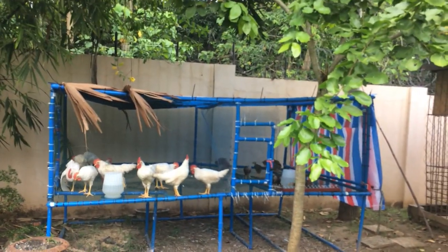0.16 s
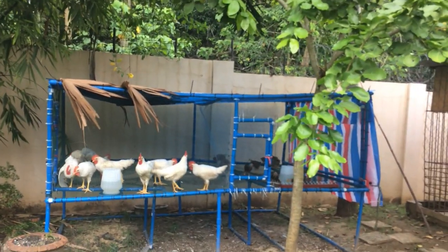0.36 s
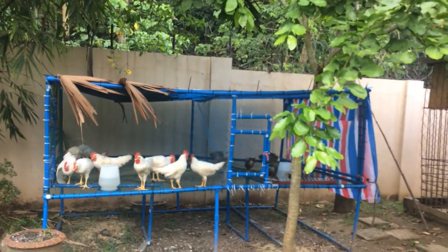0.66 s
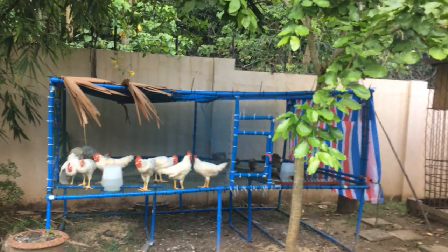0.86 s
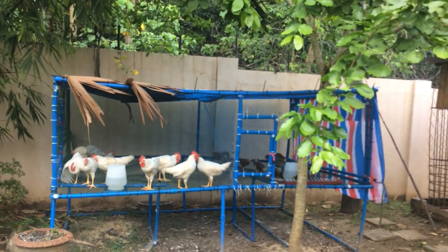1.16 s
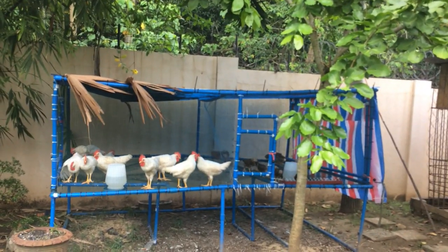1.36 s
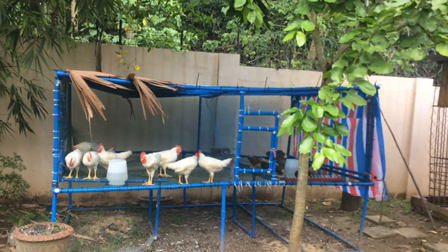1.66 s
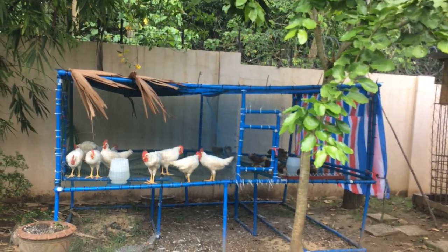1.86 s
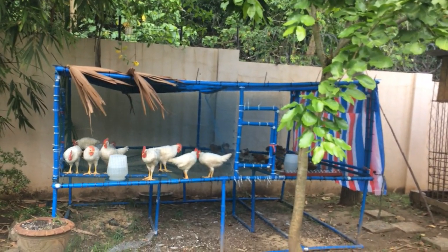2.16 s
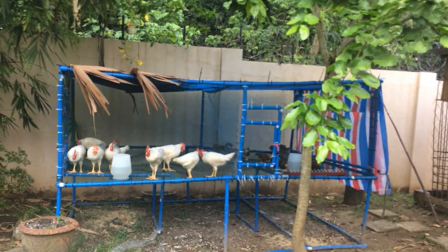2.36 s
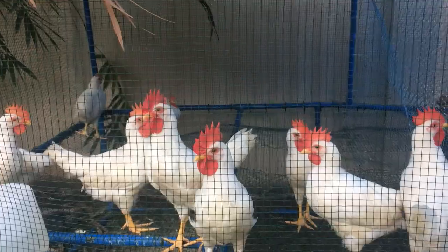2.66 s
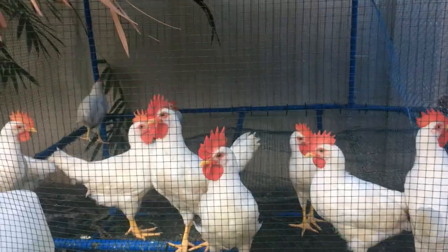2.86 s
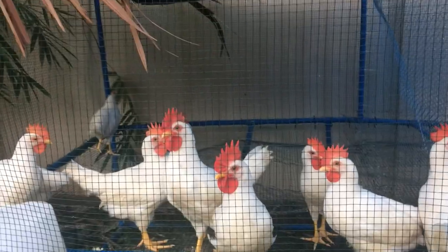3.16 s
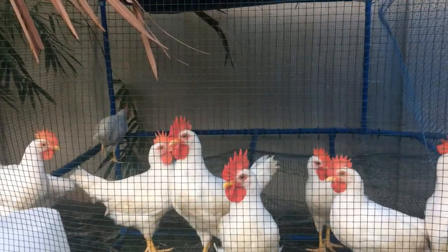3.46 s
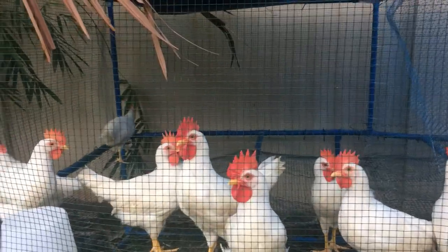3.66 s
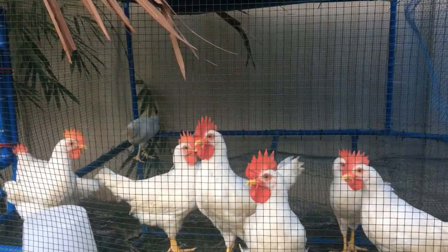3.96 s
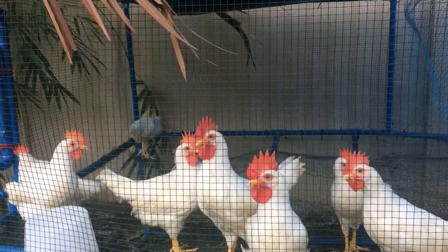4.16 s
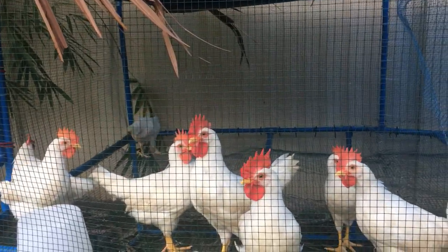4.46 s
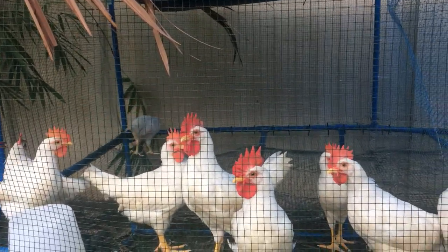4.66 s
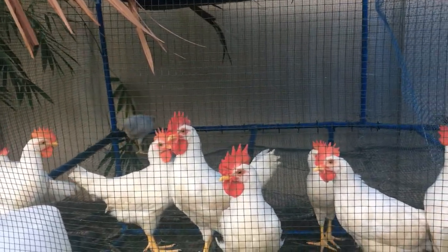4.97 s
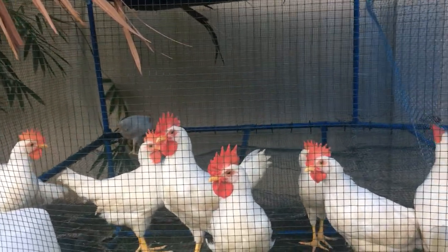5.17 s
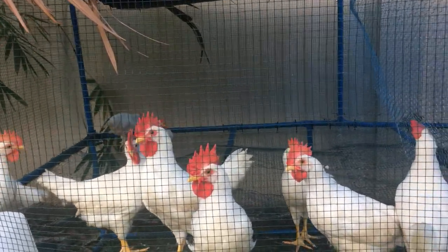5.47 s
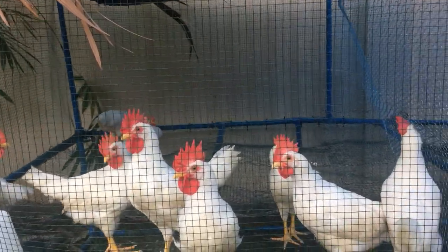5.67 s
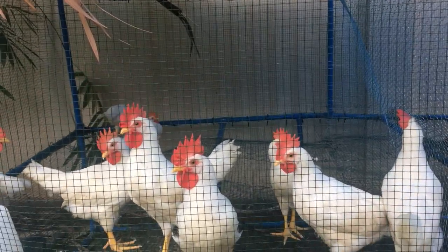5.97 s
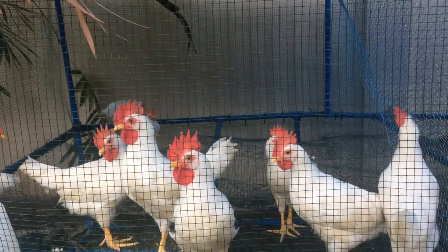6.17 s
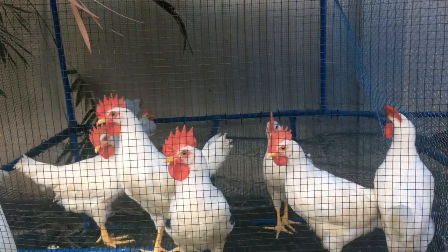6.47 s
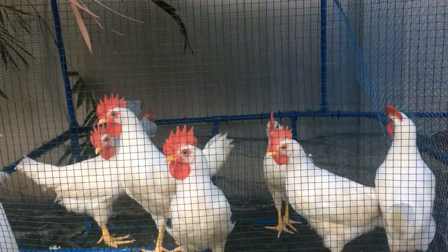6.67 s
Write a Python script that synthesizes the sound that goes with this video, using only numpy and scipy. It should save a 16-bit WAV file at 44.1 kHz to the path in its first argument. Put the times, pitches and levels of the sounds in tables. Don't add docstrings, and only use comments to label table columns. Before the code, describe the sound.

A hen clucks seven quick throaty puffs among wild bird whistles, then after a tiny dropout, thin peeps, mesh ticks, trills and low engine rumble.

```python
import sys
import numpy as np
from scipy import signal
from scipy.io import wavfile
from scipy.ndimage import uniform_filter1d

SR = 44100
rng = np.random.default_rng(int(sys.argv[2]) if len(sys.argv) > 2 else 0)


def ratio(d):
    e = np.asarray(d, float) / 20
    return 10 ** e


def file_out(sig):
    cols = np.atleast_2d(sig).T
    lim = np.clip(cols, -1, 1)
    pcm = np.round(lim * 32767).astype(np.int16)
    wavfile.write(sys.argv[1], SR, pcm)


N = 301203


def evened(x):
    return x / np.sqrt(np.mean(x ** 2) + 1e-20)


def add(mix, start_s, sound):
    part = mix[round(start_s * SR):][:len(sound)]
    part += sound[:len(part)]


def wander(count, smooth):
    size = max(int(smooth), 1)
    drift = uniform_filter1d(rng.standard_normal(count), size)
    return evened(uniform_filter1d(drift, size))


def whistle(hz, db, partials, flutter_db, hoarse):
    turns = np.cumsum(hz * (1 + hoarse * wander(len(hz), 60))) / SR
    tone = sum(ratio(d) * np.sin(2 * np.pi * k * turns) for k, d in partials)
    return np.sqrt(2) * ratio(db + flutter_db * wander(len(hz), 66)) * tone


def sagging(table, loss_per_s):
    return [(s, length, hz, hz * np.exp(-loss_per_s * length), db) for s, length, hz, db in table]


def calls(table, partials, flutter_db, hoarse, edge):
    out = np.zeros(N)
    for start_s, length_s, start_hz, end_hz, db in table:
        hz = np.linspace(start_hz, end_hz, round(length_s * SR))
        fade = signal.windows.tukey(len(hz), edge)
        add(out, start_s, fade * whistle(hz, db, partials, flutter_db, hoarse))
    return out


def hen():
    # start_s, peak_db, second_partial_hz
    clucks = [
        (0.0682, -45, 1244),
        (0.2353, -41.5, 1246),
        (0.4142, -44.5, 1210),
        (0.5952, -45, 1240),
        (0.7672, -45.5, 1233),
        (0.953, -43.5, 1282),
        (1.178, -45.5, 1224),
    ]
    partials = [(1, 0), (3 / 2, -12), (2, -10)]
    out, t = np.zeros(N), np.arange(1500) / SR
    puff = np.minimum(t / 0.0032, 1) * np.exp(-np.maximum(t - .012, 0) / 0.0052)
    for start_s, db, hz in clucks:
        pitch_hz = hz * (1.05 - 3.5 * t)
        add(out, start_s - .003, puff * whistle(pitch_hz, db - 4.5, partials, 0.9, 0.015))
    return out


def young_birds():
    # start_s, length_s, second_partial_hz, level_db
    peep_rows = [(2.645, 0.051, 6446, -72), (2.735, 0.029, 6520, -61), (2.83, 0.031, 6650, -66.5),
                 (3.145, 0.033, 6290, -63.5), (3.23, .03, 6180, -67), (3.345, 0.036, 6020, -58.5),
                 (3.475, 0.0236, 6470, -64.5), (4.12, .055, 6040, -70), (4.23, .041, 5914, -70),
                 (4.38, .11, 5850, -72), (4.715, .05, 6070, -69), (4.9, .041, 6140, -64),
                 (5.615, 0.059, 6300, -60), (5.72, 0.095, 6120, -61), (6.19, .055, 5900, -69)]
    return calls(sagging(peep_rows, 0), [(1, 0), (1 / 2, -5)], 5.2, 0.012, 0.49)


def wild_birds():
    # start_s, length_s, start_hz, level_db
    dives = [(.335, .055, 4670, -63), (.975, .04, 5000, -65), (1.4, 0.075, 4350, -62),
             (1.825, 0.063, 4622, -62), (2.4, 0.045, 2644, -58), (2.92, 0.0307, 2521, -58),
             (3.655, 0.056, 4270, -62), (4.195, .015, 2190, -55), (4.222, .05, 2975, -52),
             (4.35, .021, 2090, -60), (4.41, .03, 3704, -64), (4.44, 0.022, 2410, -56.5),
             (5.02, 0.034, 3900, -57), (5.44, .042, 2810, -64), (5.768, .04, 5750, -60),
             (6.2, 0.028, 3880, -63)]
    # start_s, length_s, start_hz, level_db
    droops = [(.005, 0.083, 2670, -58), (.17, 0.035, 3710, -61.5), (.195, 0.076, 2730, -60),
              (.35, 0.075, 2812, -59.5), (.74, 0.04, 1935, -54.5), (1.145, .03, 2610, -60),
              (1.185, 0.13, 3840, -63.5), (1.88, 0.093, 3450, -63), (1.975, 0.043, 4350, -63),
              (2.065, 0.04, 2870, -56), (2.18, 0.0375, 4300, -59), (2.29, 0.041, 3600, -61),
              (3.025, .04, 2865, -54.5), (4.525, 0.096, 3080, -59.5), (4.685, 0.044, 2550, -57.5),
              (4.73, .031, 3130, -61), (6.43, .045, 3830, -58)]
    # start_s, length_s, pitch_hz, level_db
    pips = [(.59, 0.058, 438, -59), (.645, 0.054, 3810, -64), (1.14, .021, 2330, -56),
            (1.27, 0.026, 3100, -61), (1.715, 0.038, 3520, -61), (2.14, 0.022, 688, -57),
            (2.21, 0.027, 650, -51), (2.21, 0.07, 2260, -58.5), (2.63, 0.033, 2430, -58),
            (3.415, .032, 2430, -59), (3.49, .015, 3420, -62), (3.7, .015, 4350, -57.5),
            (4.01, 0.044, 3000, -65), (4.055, .046, 2386, -59.2), (4.43, .05, 1120, -60),
            (4.81, 0.026, 3160, -59.5), (4.91, 0.042, 3180, -63), (5.0, .035, 2650, -61),
            (5.39, 0.012, 3870, -60), (5.62, 0.044, 1730, -57.5), (6.3, .02, 2240, -57)]
    rows = sagging(dives, 5.2) + sagging(droops, 1.4) + sagging(pips, 0)
    return calls(rows, [(1, 0)], 3, .017, .45)


def trill_bird():
    # start_s, level_db
    trill_strokes = [
        [(5.397, -56), (5.408, -56), (5.413, -47), (5.422, -54), (5.45, -53), (5.47, -58)],
        [(6.263, -52), (6.274, -48), (6.293, -45), (6.31, -53), (6.347, -52), (6.378, -48), (6.4, -53),
         (6.43, -57)],
    ]
    warble_s, warble_hz, swing_hz = .0272, 2990, 320
    onset_hz, onset_s = 800, .005
    out = np.zeros(N)
    for rows in trill_strokes:
        s, db = np.transpose(rows)
        t = np.arange(0, s[-1] - s[0], 1 / SR)
        phase = 2 * np.pi * t / warble_s
        hz = warble_hz + swing_hz * np.cos(phase) + onset_hz * np.exp(-t / onset_s)
        level_db = np.interp(t + s[0], s, db) + 2.5 * np.sin(phase - .5)
        fade = signal.windows.tukey(len(t), .04)
        add(out, s[0], fade * whistle(hz, level_db, [(1, 0)], 4.5, .035))
    return out


def rises():
    # start_s, length_s, top_hz, level_db, pitch_unsteadiness (0-1)
    rise_rows = [
        (.708, .19, 6700, -59.5, .006),
        (2.195, .15, 6850, -58, .006),
        (4.272, .085, 5800, -61.5, .007),
        (6.365, .165, 6800, -63, .03),
        (6.57, .06, 7900, -71, .04),
    ]
    climb_hz_per_s, widest_hz, fade_db = 17000, 2200, -10
    out = np.zeros(N)
    for start_s, length_s, top_hz, db, hoarse in rise_rows:
        u = np.linspace(0, 1, round(length_s * SR))
        span_hz = min(climb_hz_per_s * length_s, widest_hz)
        hz = top_hz - span_hz * (1 - u) ** (8.5 * length_s)
        fade = signal.windows.tukey(len(u), .2)
        add(out, start_s, fade * whistle(hz, db + fade_db * u, [(1, 0)], 4, hoarse))
    return out


def flock():
    when, length, pitch, glide, size = rng.random((120, 5)).T
    start_hz = 2300 * ratio(5.0 * pitch)
    end_hz = start_hz * (.7 + .25 * glide)
    rows = np.transpose([when * N / SR, .015 + .03 * length, start_hz, end_hz, 5 * size - 71])
    return calls(rows, [(1, 0)], 3, .05, .8)


def ticks():
    # start_s, peak_db, dullness_db (low band minus high band)
    tick_rows = [(0.7158, -49, -5), (1.9119, -52, -12), (2, -39.5, -5), (2.3294, -42.5, -2.5),
                 (2.4094, -48, -1), (3.4381, -46, -2), (3.71, -38.5, -16), (3.9639, -58, -11),
                 (4.3024, -38, -9), (4.345, -43, -4), (5.146, -53, 4.5), (5.449, -46, -5),
                 (5.54, -47, -10.5), (5.676, -48, -1), (5.9873, -42, -4), (6.0131, -52, -5.5)]
    out, t = np.zeros(N), np.arange(600) / SR
    for start_s, db, dull_db in tick_rows:
        crack = rng.standard_normal(600)
        bright = np.diff(crack, prepend=0)
        dull = ratio(dull_db) * uniform_filter1d(crack, size=7) * 3.1
        add(out, start_s, ratio(db + 0.5) * (bright + dull) * np.exp(-t / 0.0023))
    return signal.lfilter(*signal.butter(2, 6500, fs=SR), out)


def bumps():
    # start_s, peak_db
    knocks = [
        (1.2776, -29.5),
        (2.105, -44),
        (2.217, -48),
        (2.4745, -42),
        (2.544, -46),
        (2.923, -34),
    ]
    out, u = np.zeros(N), np.arange(-600, 900) / SR
    push = -.75 * np.exp(-abs(u) / np.where(u < 0, .0003, .001))
    swing = -.3 * np.cos(2 * np.pi * 95 * u) * np.exp(-(u / .007) ** 2)
    for start_s, db in knocks:
        add(out, start_s - 600 / SR, ratio(db) * (push + swing))
    return out


def walls(x, t60):
    taps = np.zeros(SR // 2)
    at = np.arange(300, len(taps) - 22, 22)
    taps[at + rng.integers(0, 22, len(at))] = rng.choice([-1., 1.], len(at))
    taps *= ratio(-60 * np.arange(len(taps)) / SR / t60)
    return signal.fftconvolve(x, taps / np.linalg.norm(taps))[:N]


def drones():
    # start_s, end_s, start_hz, end_hz, level_db
    engines = [(.2, 1.35, 33, 49, -64), (.4, 1.4, 56, 54.5, -58), (1.38, 2.4, 54.6, 55.6, -54),
               (1.5, 2.0, 171, 178, -61), (2.3, 2.57, 171, 172, -64), (2.6, 3.25, 57, 63, -49),
               (3.2, 3.6, 63, 67, -50), (3.6, 4.36, 66, 69.5, -50), (3.2, 3.85, 127, 145, -55),
               (3.9, 4.25, 143, 150, -58), (2.8, 3.25, 81, 81, -49), (2.62, 3.0, 150, 120, -53),
               (2.6, 2.85, 180, 183, -54), (3.0, 4.9, 183, 179.5, -58.5), (4.75, 5.72, 179, 177.5, -56),
               (5.8, 6.4, 176, 172, -58), (6.45, 6.8, 170, 172, -57), (4.5, 5.05, 87.5, 85, -55),
               (5.1, 6.05, 89.5, 88.5, -55), (5.9, 6.83, 89, 88, -50)]
    # start_s, end_s, start_hz, end_hz, level_db
    horn = [
        (1.66, 1.84, 702, 699, -63.5),
        (1.8, 2.64, 697, 687, -66),
        (1.8, 2.48, 612, 603, -63),
        (2.46, 2.62, 607, 609, -65),
    ]
    out = np.zeros(N)
    for start_s, end_s, start_hz, end_hz, db in [*engines, *horn]:
        hz = np.linspace(start_hz, end_hz, round((end_s - start_s) * SR))
        tone = np.sin(2 * np.pi * np.cumsum(hz * (1 + 0.0054 * wander(len(hz), 2960))) / SR)
        level = ratio(db + 2.03 * wander(len(hz), 90000 / hz.mean() + 600))
        add(out, start_s, np.sqrt(2) * level * tone * signal.windows.tukey(len(hz), .45))
    return out


def noise(shape, patchy_db, flicker_db, size, count):
    frames, hz = 4 * count // size + 5, np.fft.rfftfreq(size, 1 / SR)
    a, b, patches = rng.standard_normal((frames, len(hz), 3)).T
    patches = evened(uniform_filter1d(uniform_filter1d(patches, 7, axis=0), 12, axis=1))
    f, db = np.transpose(shape)
    colour_db = np.interp(np.log(hz + 1), np.log(f + 1), db)[:, None]
    z = (a + 1j * b) * ratio(colour_db + patchy_db * patches + flicker_db * wander(frames, 2))
    return evened(signal.istft(z, nperseg=size, noverlap=size * 3 // 4)[1][:count])


def leaves():
    # peak_s, peak_db, rise_s, fall_s
    gusts = [(.67, -66, .01, .007), (.71, -62.5, .01, 0.035), (2.0, -69, 0.06, 0.043),
             (2.57, -65, .05, .02), (2.65, -63, 0.024, .026), (2.92, -68, .026, .085),
             (3.32, -68, .066, .012), (3.45, -67.5, .04, .035), (3.71, -66.5, .014, 0.11),
             (4.2, -67.5, .11, .41), (4.7, -66.5, .008, 0.026), (5.35, -73, .058, .01),
             (5.45, -64.5, .019, 0.033), (5.54, -66, .033, .065), (6.0, -70, .028, 0.036),
             (6.6, -70, .1, 0.098)]
    # pitch_hz, level_db (per Hz)
    leaf_colour = [(300, -28), (1500, 2.5), (3500, -0.5), (7000, -6.5), (11000, -21), (15500, -19)]
    calm_db, t = -73, np.arange(N) / SR
    swells_db = [np.interp(t, [s - rise, s, s + fall], [calm_db, db, calm_db])
                 for s, db, rise, fall in gusts]
    rustle_db = np.max(swells_db, axis=0)
    gust = np.sqrt(np.maximum(ratio(rustle_db) ** 2 - ratio(calm_db) ** 2, 0))
    return ratio(11.0) * gust * noise(leaf_colour, 2.5, 1.2, 256, N)


def traffic():
    # time_s, level_db
    rumble = [(0, -58), (2.1, -58.5), (2.27, -66), (2.43, -56.5), (2.57, -83), (2.63, -54.5), (3.04, -50.5),
              (3.3, -54.5), (4.6, -55), (6.1, -53.5), (6.6, -52), (6.83, -55)]
    # pitch_hz, level_db (per Hz)
    rumble_colour = [(20, -35), (40, -6), (65, 5), (130, 2.5), (190, -4.5), (280, -16.5), (500, -44)]
    rumble_db = np.interp(np.arange(N) / SR, *np.transpose(rumble))
    return ratio(rumble_db + 4.0) * noise(rumble_colour, 0.67, 0.3, 4096, N)


def air():
    # pitch_hz, level_db (per Hz)
    yard = [(120, -11), (200, 1), (278, -9), (488, -8.5), (1050, -8), (1280, -6.5), (2380, -8),
            (10400, -26), (13900, -33), (15500, -36)]
    # pitch_hz, level_db (per Hz)
    coop = [(120, -29), (200, 1), (268, -13), (352, -13.5), (607, -14.5), (1650, -12.5), (3070, -18),
            (10400, -32), (13400, -38), (15500, -42)]
    cut = round(2.6 * SR)
    far, near = noise(yard, 1.6, 0.6, 512, cut), noise(coop, 1.35, 0.76, 512, N - cut)
    return ratio(-53) * np.append(far, near)


def scene():
    clucks, peeps, chirps, trills = hen(), young_birds(), wild_birds(), trill_bird()
    far, chatter, feet = rises(), flock(), ticks()
    echoes = ratio(-4.0) * walls(peeps, 0.4) + ratio(-1.5) * walls(feet, 0.14)
    echoes += ratio(-6.5) * walls(chirps, .4) + ratio(-5) * walls(trills, .45)
    echoes += ratio(-7.5) * walls(clucks, .3) + ratio(.5) * walls(ratio(0.5) * far + chatter, .55)
    birds = clucks + peeps + chirps + trills + far + chatter
    background = drones() + leaves() + traffic() + air()
    return (birds + feet + bumps() + echoes + background)[None]


def starve(x):
    # time_s, share (0-1)
    lost_share = [(0, 0.3), (4.35, 0.54), (4.5, .15), (6.4, .15), (6.5, .5)]
    hz, t, z = signal.stft(x, SR, nperseg=1024)
    band = (hz // 345).astype(int)
    height = np.clip((hz[:, None] - 12500) / 2500, 0, 1)
    chance = height ** 2 * np.interp(t, *np.transpose(lost_share))
    luck = rng.random((len(t) // 2 + 1, band.max() + 1))
    luck = np.repeat(luck, 2, axis=0)[:len(t)].T[band]
    return signal.istft(z * (luck > chance), SR, nperseg=1024)[1][:, :N]


def low_pass(x):
    return signal.sosfilt(signal.butter(12, 15690, fs=SR, output="sos"), x)


def record(dry):
    # start_s, end_s
    gap = (2.5752, 2.6263)
    t = np.arange(N) / SR
    on = uniform_filter1d(((t < gap[0]) | (t > gap[1])) * 1., size=24)
    band_limit = signal.firwin(401, 15730, window=("kaiser", 9), fs=SR)
    mix = signal.oaconvolve(starve(dry) * on, band_limit[None], "same")
    return low_pass(mix)


dry = scene()
out = record(dry)
file_out(out)
```